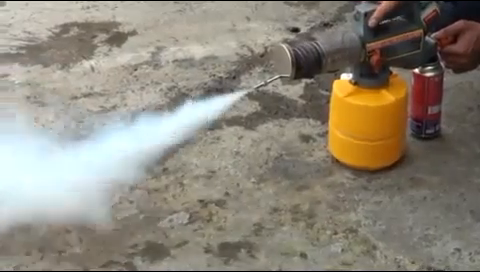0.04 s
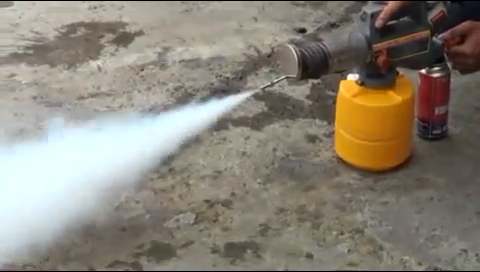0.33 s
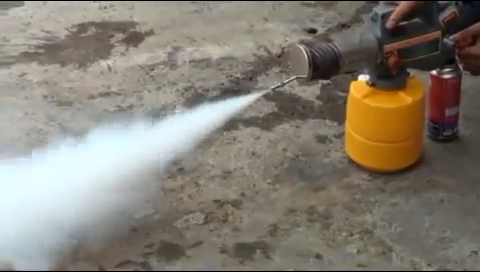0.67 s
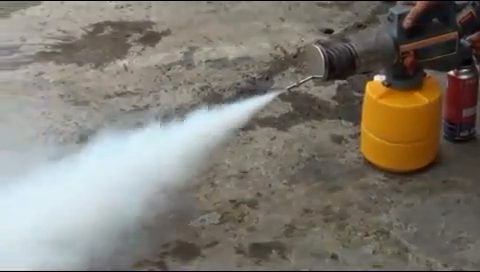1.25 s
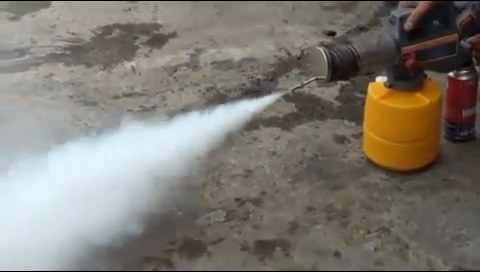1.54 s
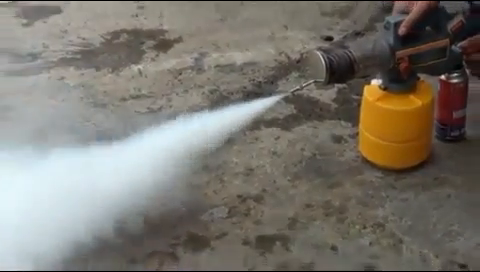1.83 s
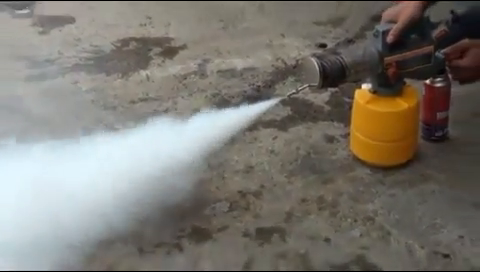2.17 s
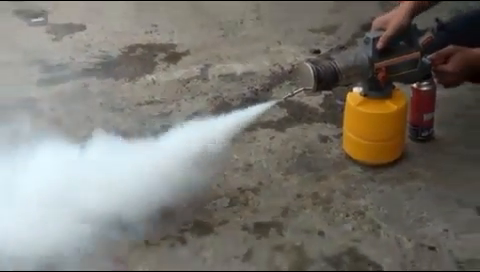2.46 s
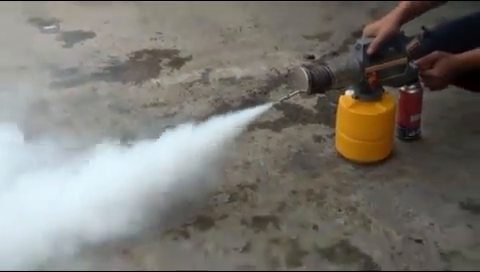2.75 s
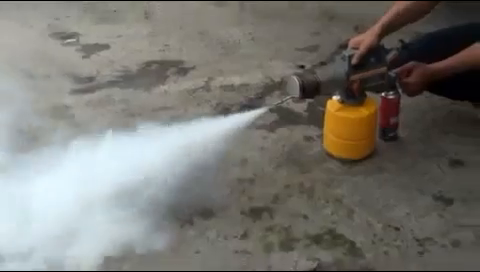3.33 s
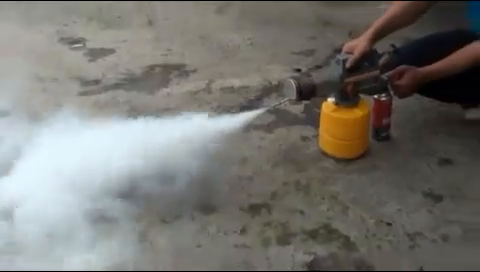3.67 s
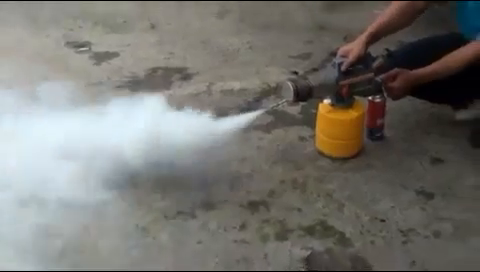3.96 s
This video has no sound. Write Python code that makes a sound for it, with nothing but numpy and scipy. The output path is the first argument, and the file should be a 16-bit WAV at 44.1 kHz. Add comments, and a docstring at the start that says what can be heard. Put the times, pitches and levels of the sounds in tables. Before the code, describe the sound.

Loud, steady hiss of a fog machine's jet, with a low flame hum and three spurts.

```python
"""A handheld thermal fogger blows one steady, hissing, turbulent jet of fog.
The concrete floor just below reflects the hiss and combs it. Under the hiss the gas burner roars,
hums near 67 Hz and sings faintly. The sound falters a few times, and the nozzle spits three loud
spurts, the last with a low double thump of air."""
import sys
import numpy as np
from scipy import signal
from scipy.fft import rfft, irfft, next_fast_len
from scipy.io import wavfile
from scipy.ndimage import uniform_filter1d, map_coordinates

SR = 44100
rng = np.random.default_rng(int(sys.argv[2]) if len(sys.argv) > 2 else 0)


def put_to_file(sound):
    """Save the sound as 16-bit audio at rate SR, in the file named by the first command-line argument."""
    columns = np.atleast_2d(sound).T  # one column per channel
    safe = np.clip(columns, -1, 1)
    whole_steps = np.round(safe * 32767)
    wavfile.write(sys.argv[1], SR, whole_steps.astype(np.int16))


N = 176400


def amp(db):
    """Decibels to gain."""
    return 10 ** (np.asarray(db) / 20)


def unit(x):
    """Scale to rms 1."""
    return x / np.sqrt(np.mean(x ** 2) + 1e-20)


def clock():
    """Sample times in seconds."""
    return np.arange(N) / SR


def curve(rows, column=1):
    """One table column, interpolated per sample; column 0 is time."""
    columns = np.transpose(rows)
    return np.interp(clock(), columns[0], columns[column])


def wobble(rate_hz):
    """Smooth random curve, rate_hz knots a second."""
    return map_coordinates(rng.standard_normal(4096), [clock() * rate_hz], mode="mirror")


def filtered(x, response):
    """Zero-phase filter; response maps Hz to gain."""
    size = next_fast_len(N + SR // 4)
    return irfft(rfft(x, size) * response(np.fft.rfftfreq(size, 1 / SR)), size)[..., :N]


def rush(spectrum):
    """Noise of rms 1 with the given spectral shape."""
    knots_hz, db = np.transpose(spectrum)

    def shape(hz):
        return amp(np.interp(np.log(hz + 1), np.log(knots_hz), db)) * hz / (hz + 10)
    return unit(filtered(rng.standard_normal(N), shape))


def patchy_hiss(x, depth_db=1.55):
    """Narrow bands of the hiss swell and fade at random."""
    bands = signal.stft(x, nperseg=1024)[2]
    patches = uniform_filter1d(rng.standard_normal(bands.shape), size=5, axis=0)  # over frequency
    patches = uniform_filter1d(patches, size=9, axis=1)  # over time
    return signal.istft(bands * amp(depth_db * unit(patches)), nperseg=1024)[1][:N]


def nozzle(x):
    """Narrow resonances whose balance drifts from start to end."""
    # Each row: centre in Hz, width in Hz, first boost in dB, last boost in dB.
    resonances = [(4590, 220, 4.5, .8), (6100, 210, 2.5, 3.5), (7350, 230, 3.5, 3.5), (8220, 250, 6, -1),
                  (11750, 400, 4, -1.5), (14370, 440, 7, 6.5)]

    def boost(hz):
        return amp(sum(np.array([[first_db], [last_db]]) * np.exp(-((hz - centre_hz) / width_hz) ** 2)
                       for centre_hz, width_hz, first_db, last_db in resonances))
    first, last = filtered(x, boost)
    return first + (last - first) * np.linspace(0, 1, N)


def floor_comb(x, cutoff_hz=6000, waver=0.085):
    """Direct sound plus a duller floor reflection; the comb shifts as the fogger moves."""
    # Each row: time in seconds, delay in ms, strength from 0 to 1.
    reflection = [(0, 0.86, 0.3), (.6, .835, 0.24), (1.3, 0.85, 0.4), (2.3, .828, 0.23), (2.85, 0.842, 0.3),
                  (3.35, 0.838, 0.24), (3.55, .83, 0.18), (4, 0.85, 0.25)]
    dull = filtered(x, lambda hz: 1 / (1 + (hz / cutoff_hz) ** 4))
    delay_samples = curve(reflection) * SR / 1000
    strength = np.clip(curve(reflection, column=2) + waver * wobble(rate_hz=6.4), 0, 1)
    return x + strength * map_coordinates(dull, [np.arange(N) - delay_samples], mode="mirror")


def jet(sway_db=0.64, flutter_db=0.38, treble_hz=7500, treble_db_per_db=0.1):
    """Fluttering turbulent hiss; a weaker jet loses its treble first."""
    # Each row: time in seconds, level in dB.
    levels = [(0, -18.5), (.3, -15), (.7, -16), (1.05, -16.5), (1.27, -19.5), (1.36, -19.5), (1.48, -17),
              (1.68, -17.5), (1.8, -16.5), (2.0, -18), (2.43, -17), (2.62, -18.5), (2.8, -19), (3.2, -18),
              (3.35, -20.5), (3.53, -18), (3.7, -21), (4, -20)]
    # Each row: frequency in Hz, relative density in dB.
    spectrum = [(200, -12), (600, -9), (1250, -2.5), (1650, -3.5), (2300, -2), (3000, -5), (3900, -2.5),
                (5400, -2.5), (7000, -0.8), (9300, -0.1), (11000, -2.5), (12600, -2.5), (15000, -7.5)]
    level_db = curve(levels)
    hiss = nozzle(patchy_hiss(rush(spectrum)))
    hiss = unit(floor_comb(hiss))
    treble = filtered(hiss, lambda hz: 1 - 1 / (1 + (hz / treble_hz) ** 4))
    hiss = hiss + treble * (amp(treble_db_per_db * (level_db - level_db.mean())) - 1)
    return hiss * amp(level_db + sway_db * wobble(rate_hz=35) + flutter_db * wobble(rate_hz=170))


def tone(hz):
    """Sine of rms 1 following a pitch curve."""
    return np.sqrt(2) * np.sin(2 * np.pi * np.cumsum(hz) / SR)


def burner_roar(level_db=-22.5, rise_db_per_s=0.34, flicker_db=1):
    """Broad, flickering roar of the gas flame, slowly growing."""
    # Each row: frequency in Hz, relative density in dB.
    spectrum = [(20, -7), (35, 5), (55, 15), (80, 14), (105, 4), (150, 5), (175, 3), (200, 0), (260, -2.5),
                (400, -2), (600, -3), (1000, -6), (1600, -18.5), (3000, -18)]
    trend_db = level_db + rise_db_per_s * (clock() - 2.5)
    return rush(spectrum) * amp(trend_db + flicker_db * wobble(rate_hz=40))


def burner_hum(trim_db=-0.1, waver_hz=1.45, waver_db=2, flutter_db=1, drift_hz=2.77):
    """The flame's low, unsteady hum and its faint singing tone."""
    # Each row: time in seconds, level in dB.
    levels = [(0.0, -17), (0.09, -24), (0.13, -18.5), (0.32, -28), (0.42, -18), (0.46, -54), (0.59, -18.5),
              (0.87, -22), (1.34, -20.5), (1.41, -46), (1.48, -22), (1.63, -24.5), (1.71, -11.5),
              (1.76, -32), (1.88, -14), (1.92, -28), (1.99, -20.5), (2.16, -17.5), (2.19, -27),
              (2.26, -18.5), (2.31, -46), (2.37, -17), (2.52, -39), (2.55, -20), (3.44, -19.5), (3.5, -28),
              (3.53, -18), (3.61, -31), (3.64, -18), (4.0, -16.5)]
    # Each row: time in seconds, pitch in Hz.
    pitches = [(0, 71), (.25, 63.5), (.48, 73.9), (.58, 65.74), (.8, 64), (1.02, 70.9), (1.32, 67.44),
               (1.45, 63.26), (1.9, 67.95), (2.35, 71), (2.75, 66.48), (3.2, 68), (3.6, 64), (4, 66.33)]
    sing_hz, sing_db = 468.3, -39
    hum = tone(curve(pitches) + drift_hz * wobble(rate_hz=27))
    unsteady_db = waver_db * wobble(rate_hz=20) + flutter_db * wobble(rate_hz=50)
    sing = tone(sing_hz + waver_hz * wobble(rate_hz=12))
    return hum * amp(curve(levels) + trim_db + unsteady_db) + sing * amp(sing_db)


def falter():
    """Gain curve with brief dips."""
    # Each row: centre in seconds, half-width in seconds, depth in dB.
    dips = [(1.399, .02, 9), (1.914, 0.028, 7.5), (2.192, 0.021, 14), (2.314, 0.009, 3)]
    return amp(-sum(depth_db * np.exp(-((clock() - centre_s) / width_s) ** 2)
                    for centre_s, width_s, depth_db in dips))


def spurts(attack_s=0.0043, release_s=0.012):
    """The nozzle spits: hiss and throaty roar swell, hold and die."""
    # Each row: start in seconds, length in seconds, hiss in dB, roar in dB.
    bursts = [(2.28, 0.021, -15.5, -19.5), (2.334, 0.035, -9.5, -13.5), (2.488, .052, -11.5, -20.5)]
    # Each row of both: frequency in Hz, relative density in dB.
    hiss_spectrum = [(200, -31), (1000, -3), (2200, 2.5), (3000, 0), (5800, 5), (8500, 3), (15000, -1.5)]
    roar_spectrum = [(40, -23), (150, -6), (240, -2), (330, 4.5), (500, 4), (850, -2), (1400, -12.5),
                     (4000, -18.5)]
    hiss, roar = rush(hiss_spectrum), rush(roar_spectrum)
    t, out = clock(), np.zeros(N)
    for start_s, length_s, hiss_db, roar_db in bursts:
        rise = (1 + np.tanh((t - start_s) / attack_s)) / 2
        fall = np.exp(-np.maximum(t - start_s - length_s, 0) / release_s)
        out += rise * fall * (amp(hiss_db) * hiss + amp(roar_db) * roar)
    return out


def thumps(boom_hz=125, puff_db=-16, width_s=0.012):
    """Short low puffs of air, each with a boom of a few cycles."""
    # Each row: centre in seconds, envelope peak in dB.
    pulses = [(2.504, -6.5), (2.538, -3.5)]
    # Each row: frequency in Hz, relative density in dB.
    puff_spectrum = [(60, -20), (130, -2), (170, 12), (260, -10), (550, -21), (1200, -44)]
    t = clock()
    boom = np.sin(2 * np.pi * boom_hz * (t - pulses[0][0]))
    envelope = sum(amp(db) * np.exp(-((t - centre_s) / width_s) ** 2) for centre_s, db in pulses)
    return (boom + amp(puff_db) * rush(puff_spectrum)) * envelope


def scene():
    """Jet and burner falter together under spurts and thumps; both channels alike."""
    running = (jet() + burner_roar() + burner_hum()) * falter()
    return np.tile(running + spurts() + thumps(), (2, 1))


def record(dry):
    """Soft peak limiter, then a steep low-pass."""
    ceiling, cutoff_hz = 0.97, 15080
    limited = dry / (1 + np.abs(dry / ceiling) ** 6) ** (1 / 6)
    return filtered(limited, lambda hz: 1 / (1 + (hz / cutoff_hz) ** 300))


dry = scene()
out = record(dry)
put_to_file(out)
```